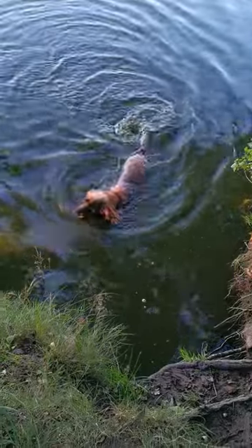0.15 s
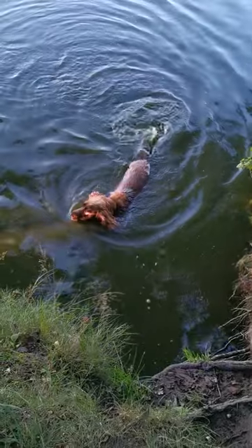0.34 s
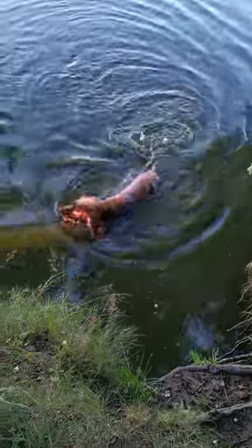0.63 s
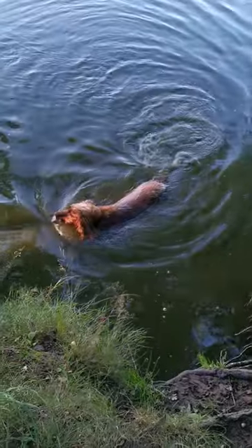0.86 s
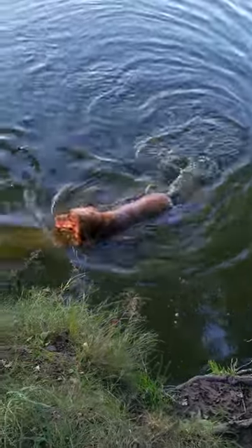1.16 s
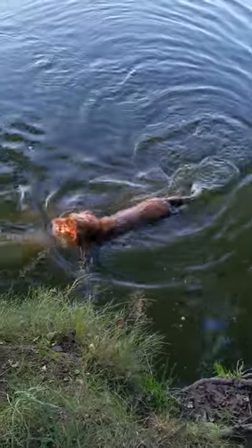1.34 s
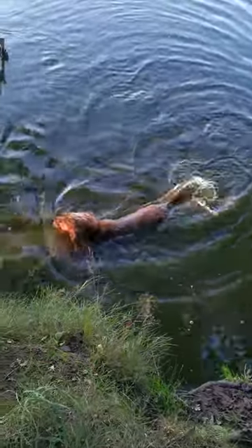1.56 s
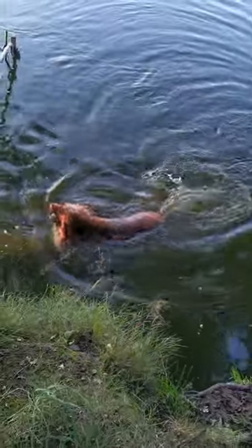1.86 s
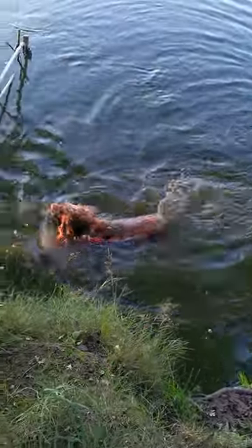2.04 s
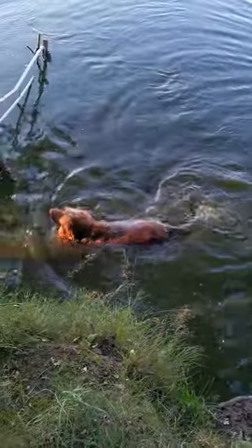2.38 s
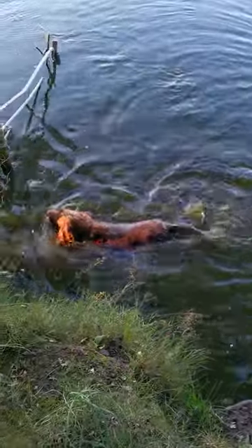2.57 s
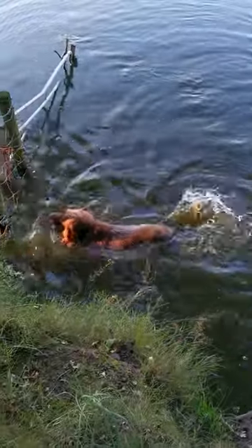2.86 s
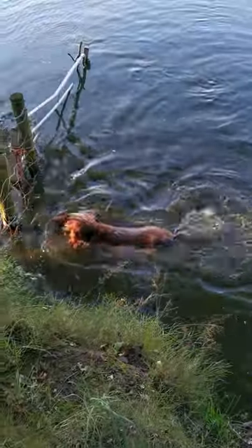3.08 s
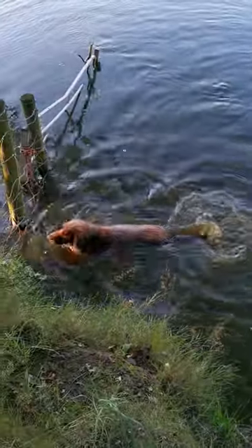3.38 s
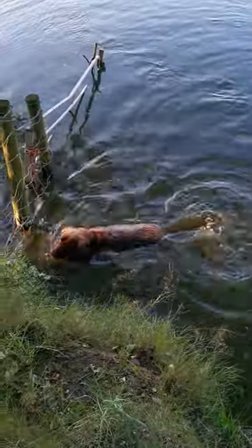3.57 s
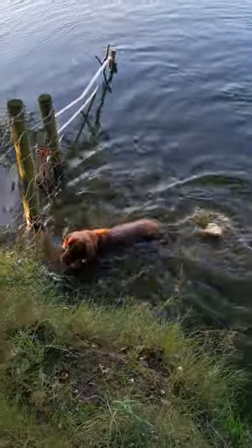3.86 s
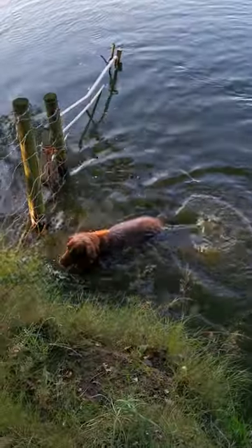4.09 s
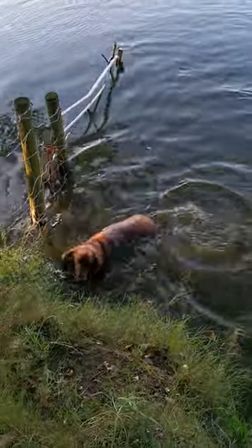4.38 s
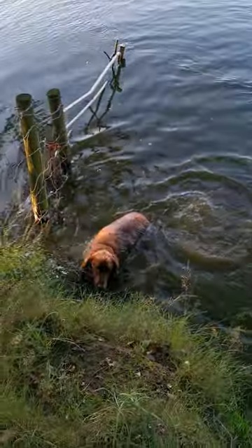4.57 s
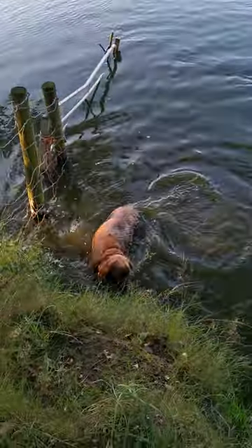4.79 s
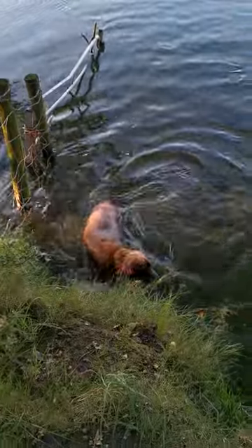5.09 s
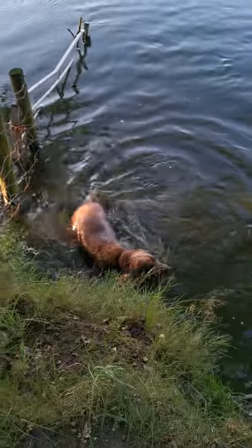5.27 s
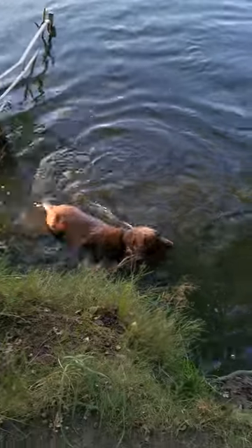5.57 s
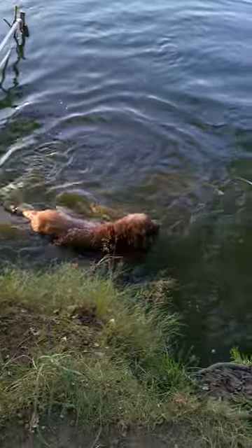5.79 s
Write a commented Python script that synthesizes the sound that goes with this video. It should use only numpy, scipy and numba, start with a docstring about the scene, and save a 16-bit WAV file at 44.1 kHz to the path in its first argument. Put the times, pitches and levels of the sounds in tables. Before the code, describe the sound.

Uneven splashing, drips and gurgles from a swimming dog, with one short wet snort, light wind buffets and a faint faraway roar.

```python
"""A dog paddles along a pond bank a few metres below a hand-held phone. From the start, wind buffets
the two microphone ports separately over a distant roar of traffic and air. Each stroke throws up
hissing spray and froth; drops tick, air pockets gulp, bubbles plink, paws and tail slap the water.
At 5.3 s the dog snorts water from its nose, and a last few splashes follow."""
import sys
import numpy as np
from scipy import signal
from scipy.fft import rfft, irfft, next_fast_len
from scipy.io import wavfile
from scipy.ndimage import uniform_filter1d, map_coordinates
from numba import njit

SR = 44100
rng = np.random.default_rng(int(sys.argv[2]) if len(sys.argv) > 2 else 0)


def wrap_up_sound(samples):
    """Save the sound to the file named by the first command line argument, as 16-bit audio."""
    columns = np.atleast_2d(samples).T
    # keep every value between -1 and 1, then stretch to whole-number steps
    tamed = np.clip(columns, -1, 1)
    steps = np.round(tamed * 32767).astype(np.int16)
    wavfile.write(sys.argv[1], SR, steps)


N = 261513
T = np.arange(N) / SR


def undb(db):
    return 10 ** (np.asarray(db) / 20)


def level(x, rms_db):
    return x * undb(rms_db) / np.sqrt(np.mean(x ** 2))


def colour(x, points, scale=1):
    """Filter by (f/Hz, gain/dB) points, the dB multiplied by scale."""
    hz, db = np.transpose(points)
    size = next_fast_len(N)
    bins_hz = np.maximum(np.arange(size // 2 + 1) * SR / size, 1)
    gain = undb(scale * np.interp(np.log(bins_hz), np.log(hz), db))
    return irfft(rfft(x, size) * gain, size)[..., :N]


def band(x, lo_hz, hi_hz, order=2):
    sos = signal.butter(order, [lo_hz, min(hi_hz, .45 * SR)], "band", fs=SR, output="sos")
    return signal.sosfilt(sos, x)


def walk(rate_hz):
    """Random steps, smoothed twice."""
    hold = int(SR / rate_hz)
    steps = np.repeat(rng.standard_normal(N // hold + 1), hold)
    return 0.59 * uniform_filter1d(uniform_filter1d(steps, hold), hold)[:N]


def pair(correlation):
    """Left and right white noise, partly alike."""
    mid, side = rng.standard_normal((2, N))
    alike = np.clip(correlation, 0, 1)
    return np.sqrt((1 + alike) / 2) * mid + np.sqrt((1 - alike) / 2) * np.array([side, -side])


@njit
def sum_rings(size, start, hz, t60_s, glide, attack_s, gain):
    out = np.zeros(size)
    for k in range(len(start)):
        phase, length = 0., int(t60_s[k] * SR)
        for i in range(min(length, size - start[k])):
            age = i / length
            phase += 2 * np.pi * hz[k] * glide[k] ** age / SR
            onset = 1 - np.exp(-i / (attack_s[k] * SR))
            out[start[k] + i] += gain[k] * np.sin(phase) * 1000. ** -age * onset
    return out


def rings(t_s, hz, t60_s, glide, attack_s, gain):
    """Damped sines; pitch moves by the factor glide within t60_s."""
    t_s, *rest = np.broadcast_arrays(np.atleast_1d(t_s), hz, t60_s, glide, attack_s, gain)
    start = (np.maximum(t_s, 0) * SR).astype(np.int64)
    return sum_rings(N, start, *(np.array(column, float) for column in rest))


def swell_db(crest_s, rise_s, hold_s, fall_db_per_s):
    """Climb 20 dB per rise_s to 0 dB, hold, fall."""
    before_db = 20 * (crest_s - T) / rise_s
    after_db = fall_db_per_s * (T - crest_s - hold_s)
    return -np.maximum(0, np.maximum(before_db, after_db))


def wind():
    """Turbulence on each port: two rumble bands, driven by the summed power of breeze and buffets."""
    # t/s, level/dB, left minus right/dB
    breeze = [(0, -51.5, 7), (0.7, -54, 7), (1.05, -52, 4.5), (1.45, -54, 4), (2.0, -47, 0.5),
              (2.75, -54, 5.5), (3.3, -54, 5), (3.9, -52, 4.5), (4.4, -54, 4), (4.9, -55, 1.5),
              (5.2, -50, 5), (5.93, -53, 11)]
    # crest t/s, width/s, level/dB, left minus right/dB
    buffets = [(0.065, 0.06, -45.5, 8), (0.331, 0.024, -48, 15), (0.51, 0.044, -50, 16.5),
               (0.7, 0.037, -48, 8), (1.169, 0.032, -32, 0), (1.234, 0.024, -43.5, -10),
               (1.35, .04, -55, -6), (2.15, 0.037, -54.5, -9), (2.86, 0.024, -48, -12),
               (3.0, 0.073, -46.5, -2.5), (3.179, 0.015, -50.5, 8), (3.51, 0.059, -45.5, 14.5),
               (3.63, 0.02, -42, 7), (4.06, 0.045, -42, 7), (4.235, 0.018, -46.5, 9), (4.37, 0.016, -56, 8),
               (4.542, 0.029, -49, 4), (4.76, 0.055, -53, 5), (5.12, 0.032, -49, 26.5),
               (5.33, 0.11, -44, 7), (5.58, 0.057, -46.5, -4), (5.68, 0.011, -52, 15),
               (5.88, 0.051, -53.5, 9)]
    sides = np.array([[.5], [-.5]])
    t_s, *columns = np.transpose(breeze)
    db, pan_db = (np.interp(T, t_s, column) for column in columns)
    power = undb(db + sides * pan_db) ** 2
    for t_s, width_s, db, pan_db in buffets:
        power += undb(db + sides * pan_db) ** 2 * np.exp(-((T - t_s) / width_s) ** 2)
    deep = level(band(pair(0.53), 23.1, 66.5), 2.3) * undb([4.2 * walk(30), 0.56 * walk(30)])
    upper = level(band(pair(0.4), 95.4, 135.7), -10.67) * undb([3.5 * walk(24.31), 6.3 * walk(34)])
    upper = signal.sosfilt(signal.butter(2, 240, fs=SR, output="sos"), upper)
    return (deep + upper) * np.sqrt(power)


def distant_roar():
    """Traffic and air: octave bands that drift alone, alike on both ports only in the bass."""
    # f/Hz, gain/dB
    spectrum = [(88, -19), (150, -7.5), (286, -7.5), (662, -7.5), (941, -7.5), (1100, -10.5), (1450, -17.5),
                (1870, -34), (2220, -25), (3620, -27), (5460, -27), (6910, -31), (16000, -32.5)]
    roar = 0
    for hz in 150 * 2. ** np.arange(7):
        roar += band(pair(350 / hz), hz, 2 * hz) * undb(0.27 * walk(4.95) + 3.6 * walk(40))
    return level(colour(roar, spectrum), -64.5)


def swarm(lo_hz, hi_hz, cycles, spread_db, count):
    """Small bubbles of scattered size at random times; unit RMS."""
    when, pitch = rng.random((count, 2)).T
    hz = lo_hz * (hi_hz / lo_hz) ** pitch
    db = spread_db * np.clip(rng.standard_normal(count), -2, 2)
    return level(rings(when * N / SR, hz, cycles / hz, 1.03, 0.28 / hz, undb(db)), 0)


def paddling():
    """Each stroke throws up droplet spray and churns in froth bubbles, adding power to calm water."""
    # crest t/s, rise/s, hold/s, spray/dB, froth/dB
    strokes = [(0.0, .01, 0.013, -59, -53), (0.08, 0.0092, 0.005, -72, -59), (0.156, 0.015, 0, -63, -58.5),
               (0.43, 0.056, 0, -62.5, -54), (0.536, 0.032, 0.042, -58.5, -62),
               (0.625, 0.087, 0.036, -55, -50.5), (0.73, 0.036, 0, -61.5, -66), (1.032, .01, 0, -69, -55),
               (1.093, 0.055, 0.089, -61.5, -58.5), (1.421, 0.016, 0, -62.5, -53.5),
               (1.547, 0.014, .07, -63, -52), (1.769, 0.3, 0.0081, -51.5, -52),
               (1.842, .05, 0.068, -52, -52.5), (2.24, 0.0096, 0, -68, -55), (2.36, 0.14, 0.022, -66, -68),
               (2.476, 0.0096, 0.0033, -59.5, -55.5), (2.626, 0.031, 0, -71, -73),
               (2.702, .01, 0.13, -60.5, -52.5), (2.787, 0.061, 0.076, -54.5, -53),
               (3.023, 0.33, 0.024, -49.5, -45.5), (3.16, 0.14, 0.05, -64, -57),
               (3.413, 0.11, 0.046, -68, -62.5), (3.49, 0.0067, 0.0098, -54.5, -50.5),
               (3.66, 0.026, 0.0041, -61.5, -56), (3.83, .05, 0.092, -66.5, -58),
               (3.992, 0.074, .08, -73, -66.5), (4.137, 0.045, 0, -65.5, -55),
               (4.92, 0.027, 0.0074, -74, -65.5), (5.055, 0.14, 0.029, -66.5, -72),
               (5.26, .2, 0.09, -62.5, -59), (5.524, 0.0083, 0.093, -78, -82),
               (5.62, 0.074, 0.25, -68.5, -61.5), (5.705, 0.019, 0.21, -60.5, -53)]
    # spray hiss as coloured by the phone's microphone: f/Hz, gain/dB
    spray_at_mic = [(1470, -10), (2500, -28.5), (2770, -9.5), (3890, -8), (4650, -4), (5690, -9),
                    (7420, -1), (9150, -9.5), (10000, -15.5), (10700, -8), (11900, -10.5), (13000, 1),
                    (14000, -2), (15200, 3.5), (16000, 7)]
    spray_power, froth_power = undb(-88) ** 2, undb(-70) ** 2  # calm water
    for t_s, rise_s, hold_s, spray_db, froth_db in strokes:
        spray_power += undb(spray_db + swell_db(t_s, rise_s, hold_s, fall_db_per_s=151)) ** 2
        froth_power += undb(froth_db + swell_db(t_s, rise_s, hold_s, fall_db_per_s=158)) ** 2
    noise = pair(0.03)
    clumps_db = 4 * walk(45)  # drops land in clumps
    low_hiss = band(noise, 2400, 5720) * undb(clumps_db + 4.5 * walk(60))
    high_hiss = band(noise, 9140, 11700) * undb(clumps_db + 2.5 * walk(60))
    spatter = 0.6 * swarm(8000, 15500, cycles=5, spread_db=5, count=1600)
    spatter += 1.5 * swarm(2500, 6000, cycles=30, spread_db=6, count=1200)
    spray = level(low_hiss + high_hiss, 0) + undb(-5) * spatter
    spray = level(colour(spray, spray_at_mic), 1)
    small = swarm(1313, 2670, cycles=24, spread_db=10.6, count=2200)
    large = swarm(622, 1220, cycles=38, spread_db=6.6, count=1000)
    trapped_db = np.clip(10 * np.log10(spray_power) + 72, -15, 0) - 9  # calm water traps few bubbles
    wash = level(band(pair(0.067), 640, 2060) * undb(clumps_db), -5.5)
    froth = undb(trapped_db) * (small + large) + wash
    return np.sqrt(spray_power) * spray + np.sqrt(froth_power) * froth


def tick(t_s, db, hz):
    """A drop's impact clicks, then its crater rings."""
    click = rings(t_s, 10100, t60_s=0.00057, glide=1, attack_s=.00003, gain=undb(db))
    crater = rings(t_s, hz, t60_s=20 / hz, glide=1.06, attack_s=.0001, gain=undb(db))
    return click + crater


def drips():
    """Single drops hit the surface."""
    # t/s, level/dB, f/Hz
    drops = [(0.0149, -40.5, 6700), (0.475, -48, 3660), (0.545, -48, 3800), (0.565, -50, 3500),
             (1.74, -46, 4500), (1.77, -40, 3300), (1.8517, -43, 7680), (2.4907, -39, 10700),
             (2.5094, -45, 10360), (2.33, -52, 4300), (2.7034, -46, 7260), (3.5432, -40.5, 7070),
             (3.837, -38.5, 6400), (3.962, -46, 12500), (4.305, -49, 11000), (4.6049, -43.5, 5530),
             (4.903, -46, 2900), (4.9163, -42, 5730), (4.982, -50, 5500), (5.017, -45, 4570),
             (5.0569, -50, 3820), (5.099, -56, 4500), (5.118, -46, 8020), (5.1432, -45, 4500),
             (5.1712, -37.5, 6020), (5.2017, -41, 6410), (5.23, -37, 8500), (5.8132, -35, 7410)]
    return tick(*np.transpose(drops))


def gulps():
    """Air pockets close; most sweep up in pitch."""
    # t/s, length/s, start f/Hz, end f/Hz, level/dB
    pockets = [(0.032, 0.064, 259, 572, -56), (1.129, .03, 450, 535, -55), (1.33, 0.027, 500, 840, -55),
               (2.799, 0.0448, 523.6, 802, -53.5), (3.554, 0.13, 239, 566, -56),
               (3.92, 0.11, 211.5, 468, -60.5), (4.139, 0.065, 308, 349, -63), (5.73, 0.022, 290, 335, -41),
               (5.802, 0.062, 310, 308, -54.5)]
    wobble = undb(6 * walk(70))
    waver = 1 + .06 * walk(90)
    out = np.zeros(N)
    for t_s, length_s, start_hz, end_hz, db in pockets:
        age = np.clip((T - t_s) / length_s, 0, 1)
        hz = waver * (start_hz + (end_hz - start_hz) * age ** 1.8)
        envelope = undb(db) * wobble * np.sin(np.pi * age) ** 0.09
        out += envelope * np.sin(2 * np.pi * np.cumsum(hz) / SR)
    return out


def bubbles():
    """Lone bubbles ring and rise in pitch; three smaller or larger ones break off each."""
    # t/s, level/dB, f/Hz
    plinks = [(0.07, -26.5, 3360), (0.097, -39.5, 680), (0.34, -49, 2000), (0.409, -37.5, 1900),
              (0.425, -42.5, 850), (0.475, -36, 643), (0.477, -44.5, 1910), (0.607, -40, 1200),
              (0.626, -25.5, 647), (0.64, -19.5, 650), (0.731, -42, 670), (0.755, -39, 2130),
              (1.027, -36, 1980), (1.111, -29.5, 1697), (1.426, -46, 480), (1.551, -32.5, 825),
              (1.553, -34, 1310), (1.553, -37, 2040), (1.585, -39, 750), (1.624, -39, 860),
              (1.674, -34.5, 1790), (1.752, -36, 1910), (1.762, -39.5, 518), (1.817, -41, 1970),
              (1.853, -22, 773), (1.877, -35.5, 1890), (1.894, -43.5, 560), (1.93, -37, 2050),
              (2.002, -43, 685), (2.234, -37.5, 2060), (2.248, -39, 2150), (2.257, -42.5, 1990),
              (2.297, -44.5, 1860), (2.4645, -37.5, 1490), (2.477, -43, 1000), (2.509, -45, 1300),
              (2.613, -39, 1006), (2.696, -48, 770), (2.721, -36, 1410), (2.805, -33.5, 1945),
              (2.853, -37, 545), (2.873, -38, 1070), (2.989, -25, 2055), (2.991, -23.5, 1570),
              (3.035, -31, 920), (3.16, -37.5, 1830), (3.248, -33.5, 1905), (3.312, -44.5, 2010),
              (3.419, -40.5, 1006), (3.481, -34.5, 1890), (3.487, -31.5, 1026), (3.518, -40, 804),
              (3.52, -43, 1690), (3.544, -43, 1260), (3.82, -41, 2220), (3.845, -38.5, 1990),
              (3.86, -40, 628), (3.885, -42, 606), (3.961, -40, 1700), (4.135, -41, 1090),
              (5.058, -24.5, 3630), (5.205, -49, 1870), (5.227, -43, 1530), (5.272, -24.5, 440),
              (5.714, -31, 945), (5.717, -36, 2010), (5.777, -36.5, 2110), (5.804, -33, 1300),
              (5.815, -42, 2120), (5.895, -41, 950)]
    t_s, db, hz = np.transpose(plinks)
    t60_s = 0.028 * (hz / 1000) ** -0.42  # smaller bubbles die sooner
    glide = 1.095
    out = rings(t_s - .0015, hz, t60_s, glide, attack_s=0.11 * t60_s, gain=undb(db))
    for delay, pitch in rng.random((len(t_s), 3, 2)).transpose(1, 2, 0):
        split_s = t_s + 0.00297 + 0.027 * delay
        split_hz = hz * 1.49 ** (pitch - .45)
        split_db = db - 5.5 - 8.8 * delay
        out += rings(split_s, split_hz, 0.54 * t60_s, glide, attack_s=0.0013, gain=undb(split_db))
    return out


def slaps():
    """Paws and tail hit the water: a sharp burst, a lower and shorter hollow, a first drop's tick."""
    # t/s, level/dB, t60/s, centre f/Hz, tick/dB
    hits = [(0.153, -47, 0.064, 4400, -52), (0.404, -52.5, 0.2, 4300, -53), (0.62, -55, 0.68, 6800, -35.5),
            (0.7273, -46.5, 0.079, 5460, -35.5), (1.025, -49.5, 0.084, 4360, -55),
            (1.4282, -52, 0.16, 3640, -50), (1.545, -49, 0.29, 4160, -52), (1.707, -48.5, 0.58, 2650, -47),
            (1.893, -53, 0.055, 4140, -31), (2.2328, -53, 0.45, 2770, -60),
            (2.477, -49, 0.26, 11300, -34.5), (2.694, -53, 0.23, 7000, -52), (3.24, -55, 0.22, 4800, -57),
            (3.486, -48, 0.052, 4780, -51), (3.6633, -47, 0.072, 3520, -40), (4.139, -46, 0.13, 11200, -45),
            (5.7085, -48.5, 0.23, 2940, -50), (5.7304, -41.5, 0.038, 3000, -48),
            (5.836, -44, 0.026, 5450, -41)]
    size = int(.25 * SR)
    age_s = T[:size]
    out = np.zeros((2, N))
    for t_s, db, t60_s, hz, tick_db in hits:
        burst = band(pair(0.15)[:, :size], hz / 1.13, hz * 1.15, order=1)
        burst *= undb(2.8 * walk(102)[:size])
        burst = level(burst, db - 6) * 1000. ** (-age_s / t60_s)
        hollow = band(pair(0.43)[:, :size], 900, 2300, order=1)
        hollow = level(hollow, db - 18) * 1000. ** (-age_s / (0.1 * t60_s))
        start = int(t_s * SR)
        out[:, start:start + size] += (burst + hollow)[:, :N - start]
        out += tick(t_s, tick_db, hz)
    return out


def eddies():
    """Single eddies thump the left port, then the right."""
    # t/s, level at the louder port/dB, f/Hz, left minus right/dB
    thumps = [(0.312, -22.5, 102, 28), (1.148, -38, 105, 9), (1.1737, -10.5, 168, 1), (1.218, -20, 84, -9),
              (1.32, -20, 74.5, -9), (2.848, -23, 75.6, -14), (3.46, -27, 92, 18), (3.546, -16.5, 90.5, 30),
              (3.615, -26, 94.6, 16), (4.023, -23, 89.6, 17), (4.529, -19.5, 55.4, 9),
              (5.11, -14.5, 88, 35), (5.264, -20.5, 118, 21), (5.368, -42, 110, 3), (5.564, -24, 81, -26),
              (5.677, -26, 85.6, 20)]
    t_s, db, hz, pan_db = np.transpose(thumps)
    ports = []
    for lag_s, side_db in ((0, pan_db), (0.00318, -pan_db)):
        gain = undb(db + np.minimum(0, side_db))
        ports.append(rings(t_s + lag_s, hz, t60_s=5.56 / hz, glide=0.75, attack_s=0.41 / hz, gain=gain))
    return np.array(ports)


def airflow(peaks, sputter, correlation):
    """Sputtering noise in parallel bands; unit RMS."""
    out = 0
    for hz, width_hz, db in peaks:
        jet = pair(correlation) * sputter
        out += level(band(jet, hz - width_hz / 2, hz + width_hz / 2, order=1), db)
    return level(out, 0)


def snort():
    """A wet jet through the nose blows ever harder, breaks off and trails away, with hiss above it."""
    # resonances: f/Hz, width/Hz, level/dB
    nose = [(290, 350, -7), (487, 46, -8), (820, 210, -1), (1316, 120, -1), (1820, 220, -10),
            (2700, 1100, -7)]
    # snort hiss, with the microphone's treble peaks near 11 and 13 kHz: f/Hz, width/Hz, level/dB
    hiss_at_mic = [(3840, 1300, -9), (6700, 820, 1), (8350, 510, -11), (10880, 200, -4),
                   (13100, 1600, -7.5)]
    start_s, blow_s = 5.269, .113
    jet_rise_s, hiss_rise_s, hiss_extra_s = .008, .03, .04
    progress = (T - start_s) / blow_s
    jet_db = -35 + np.where(progress < 1, 6 * np.maximum(progress, 0) ** 2, -3)
    jet_db += swell_db(start_s + jet_rise_s, jet_rise_s, blow_s - jet_rise_s, fall_db_per_s=187)
    hiss_hold_s = blow_s - hiss_rise_s + hiss_extra_s
    hiss_db = -43.5 + swell_db(start_s + hiss_rise_s, hiss_rise_s, hiss_hold_s, fall_db_per_s=200)
    sputter = undb(4.5 * walk(350) + 1.2 * walk(80))
    jet = undb(jet_db) * airflow(nose, sputter, correlation=0.63)
    hiss = undb(hiss_db) * airflow(hiss_at_mic, sputter, correlation=0.12)
    return (progress > 0) * (jet + hiss)


def phone_body(left, right):
    """The duct behind the right port rings; the body colours the two ports oppositely."""
    # f/Hz, left-right contrast before scaling/dB
    shading = [(60, 17), (110, -31), (200, 0), (380, -1), (700, -2.5), (1290, -4), (2380, -2), (4400, 2),
               (8120, -0.5), (15000, -8.5)]
    duct_hz, width_hz = 2122, 350
    duct = undb(4.1) * band(right, duct_hz - width_hz / 2, duct_hz + width_hz / 2, order=1)
    return np.array([colour(left, shading, scale=0.96), colour(right + duct, shading, scale=-0.29)])


def scene():
    water = paddling() + slaps() + drips() + bubbles() + gulps()
    right_lag_s = .00011  # the water is nearer the left port
    water[1] = map_coordinates(water[1], [np.arange(N) - right_lag_s * SR], order=3)
    left, right = water + snort()
    return phone_body(left, right) + distant_roar() + wind() + eddies()


def record(dry):
    """The phone cuts the top."""
    top_hz = 15900
    return signal.sosfilt(signal.ellip(10, .2, 70, top_hz, fs=SR, output="sos"), dry)


dry = scene()
out = record(dry)
wrap_up_sound(out)
```